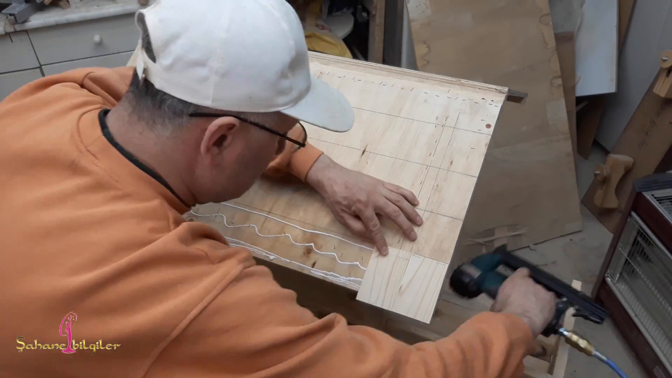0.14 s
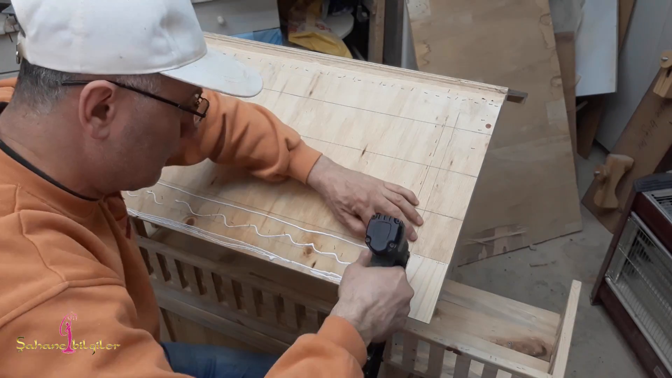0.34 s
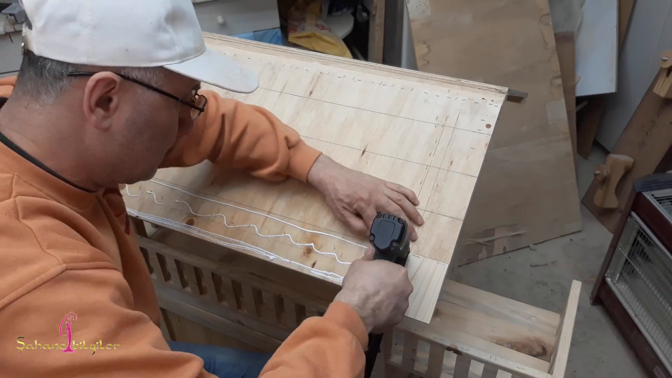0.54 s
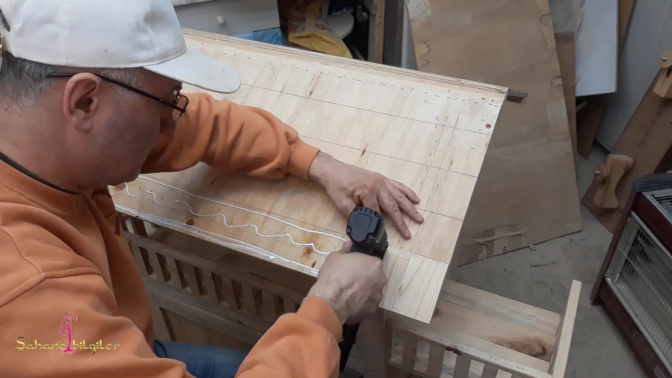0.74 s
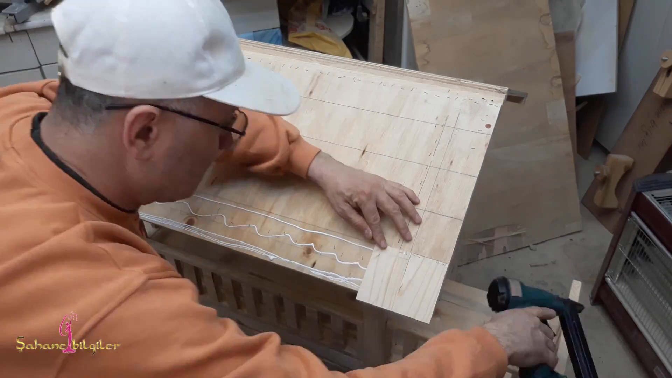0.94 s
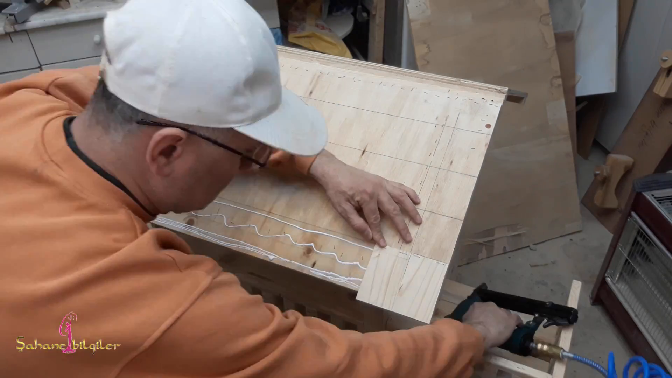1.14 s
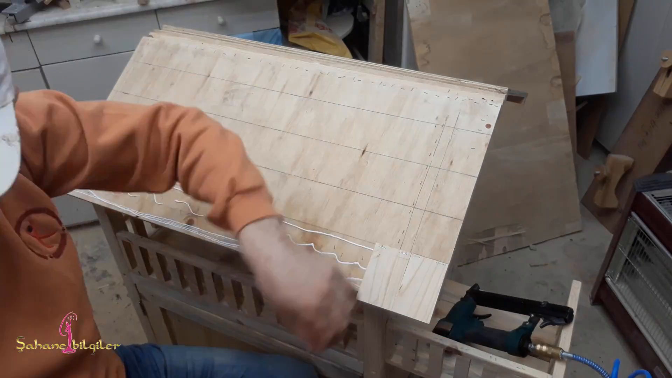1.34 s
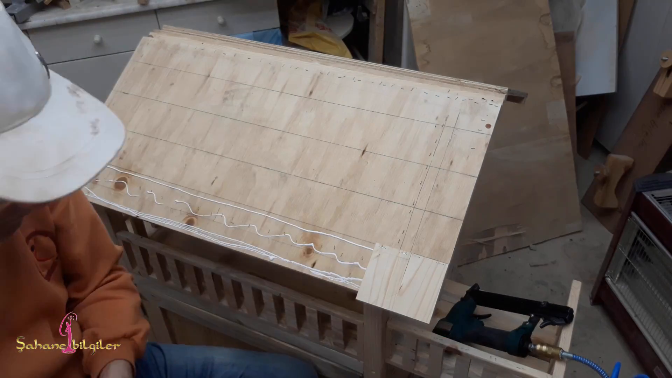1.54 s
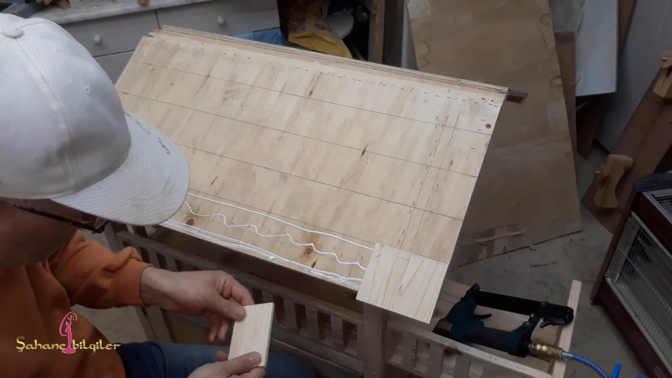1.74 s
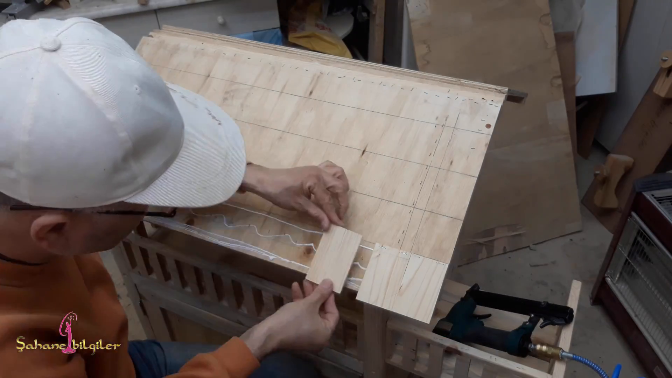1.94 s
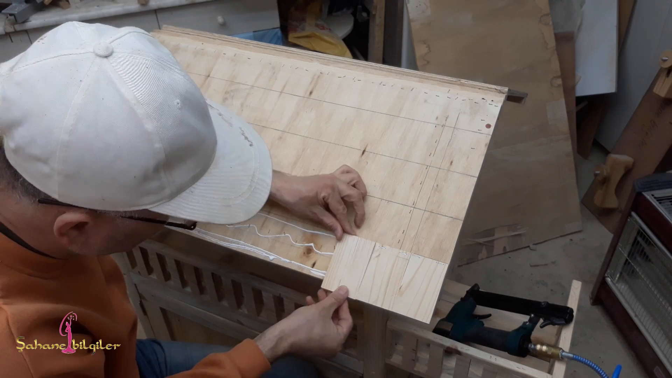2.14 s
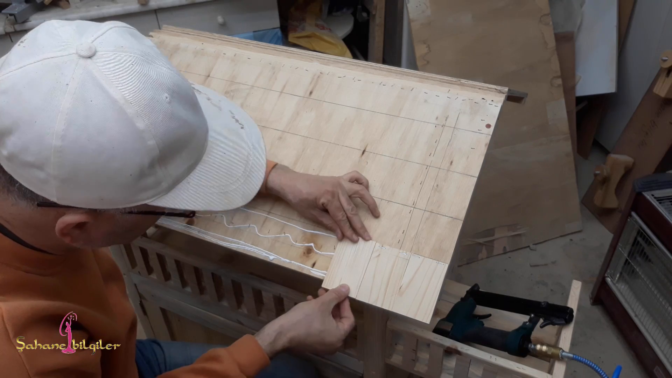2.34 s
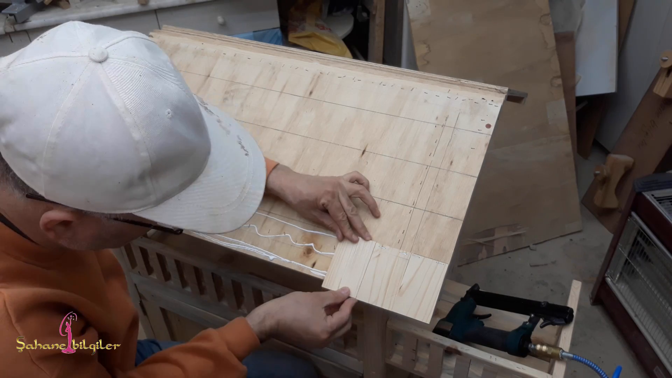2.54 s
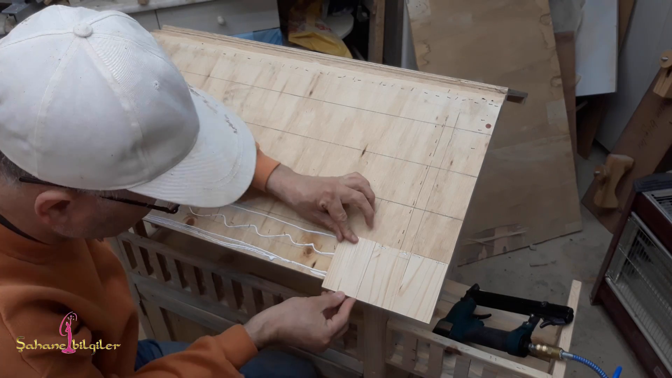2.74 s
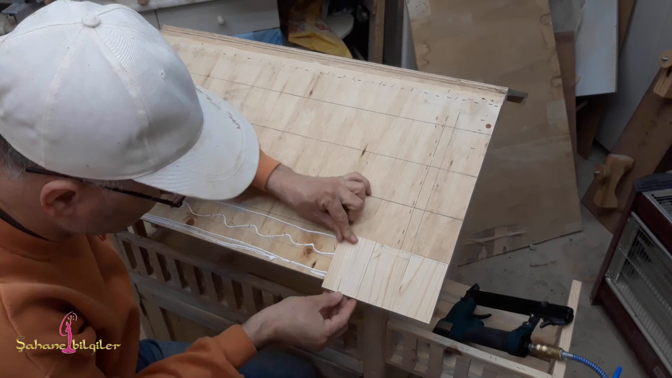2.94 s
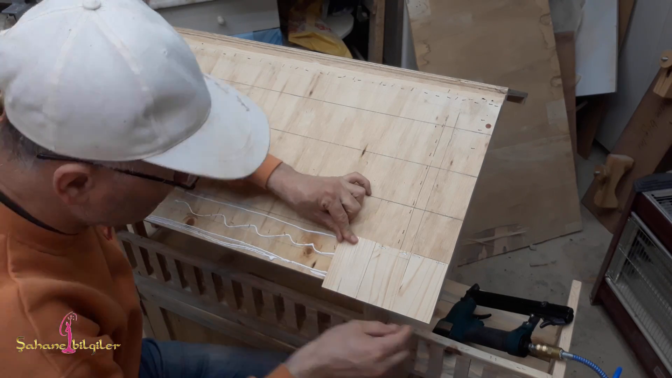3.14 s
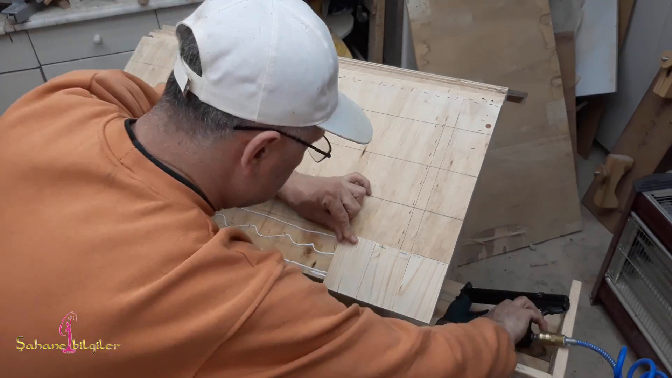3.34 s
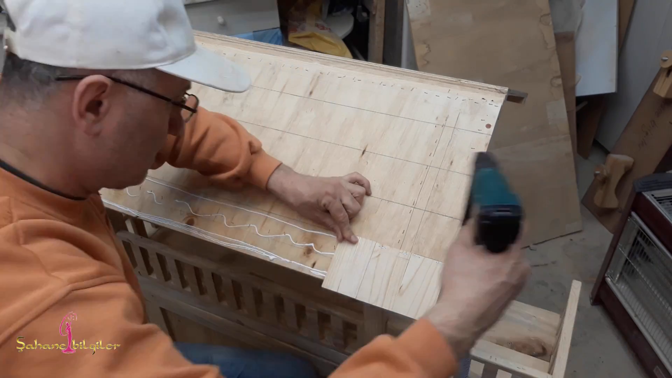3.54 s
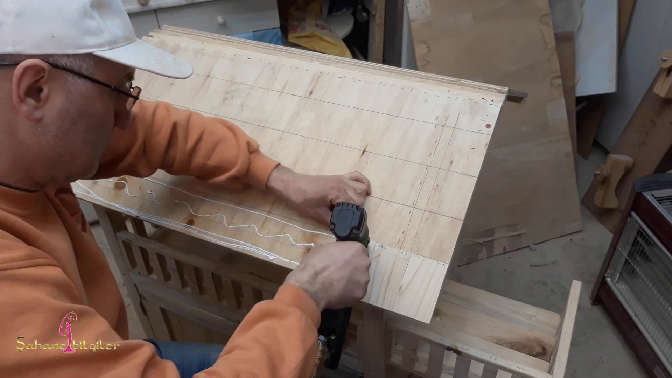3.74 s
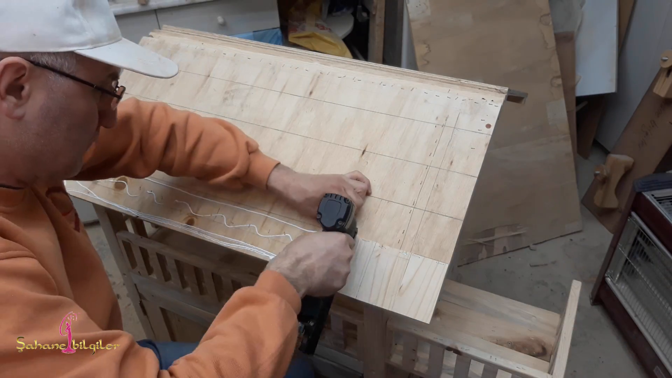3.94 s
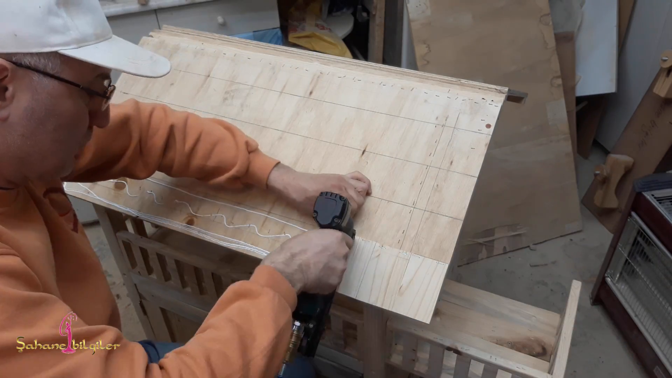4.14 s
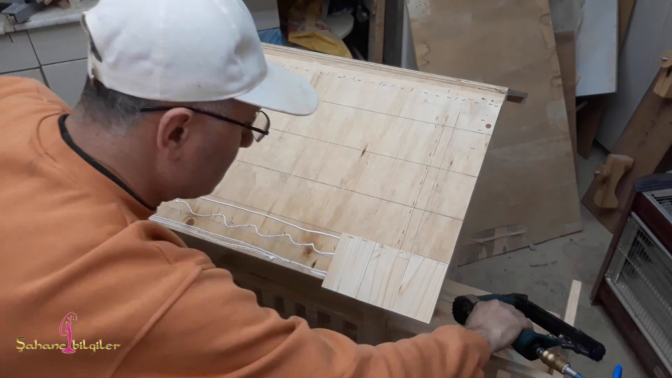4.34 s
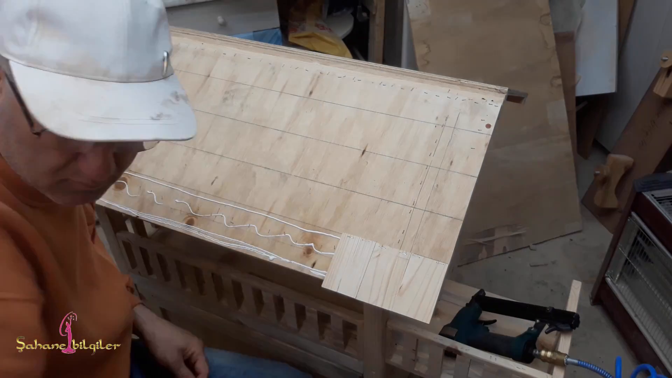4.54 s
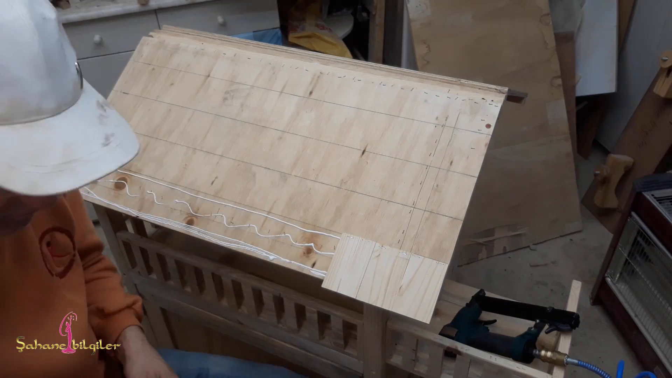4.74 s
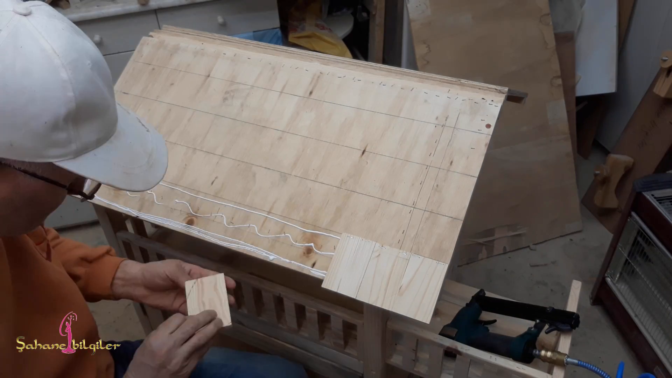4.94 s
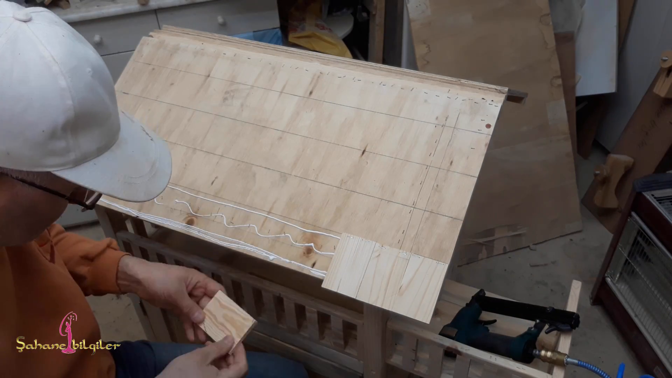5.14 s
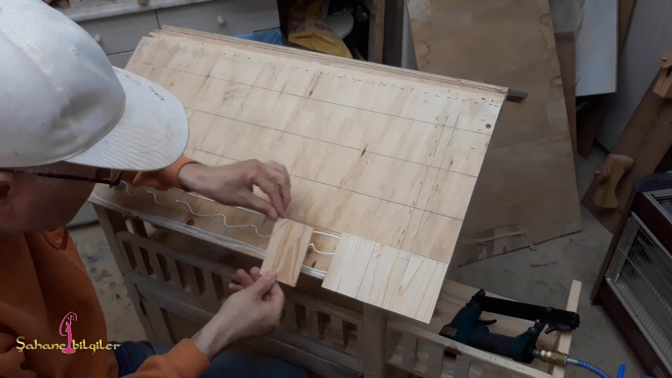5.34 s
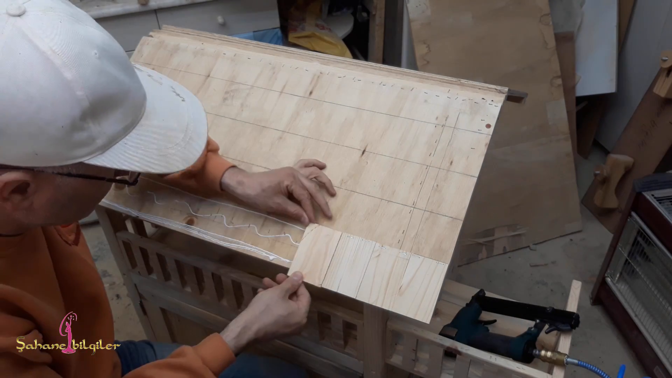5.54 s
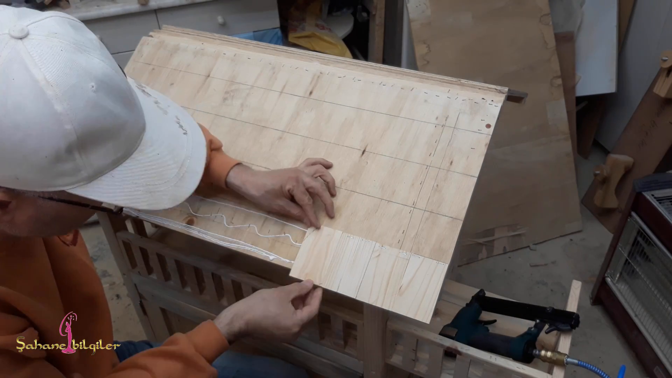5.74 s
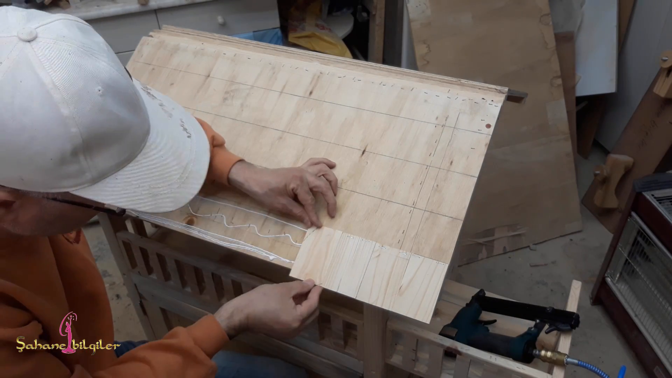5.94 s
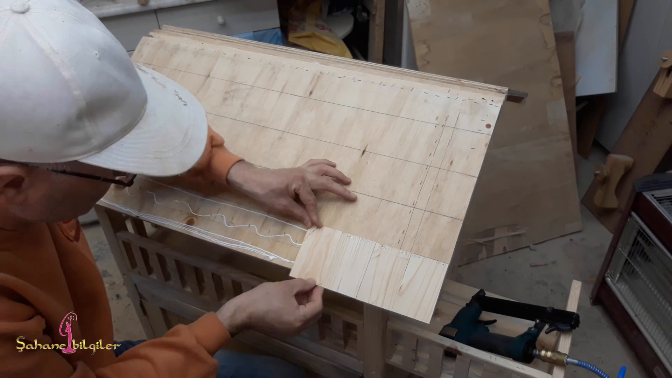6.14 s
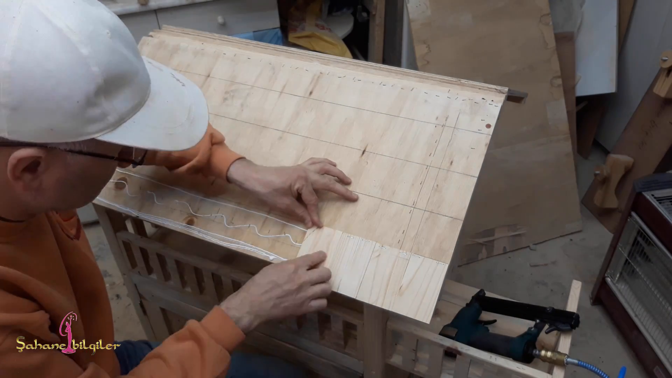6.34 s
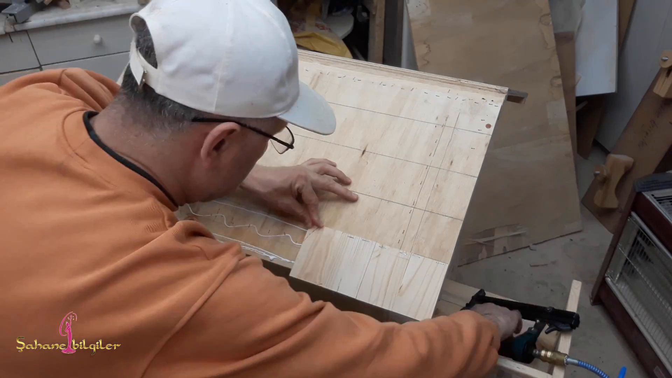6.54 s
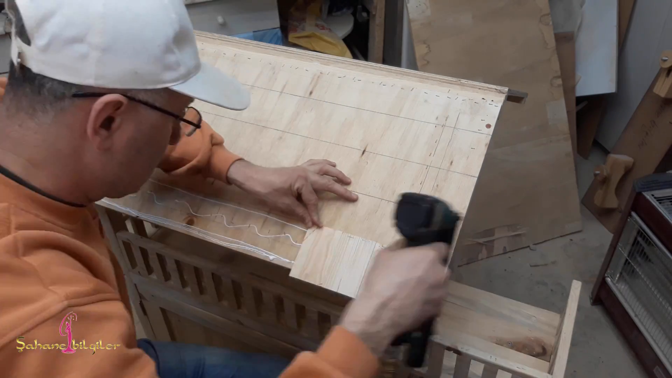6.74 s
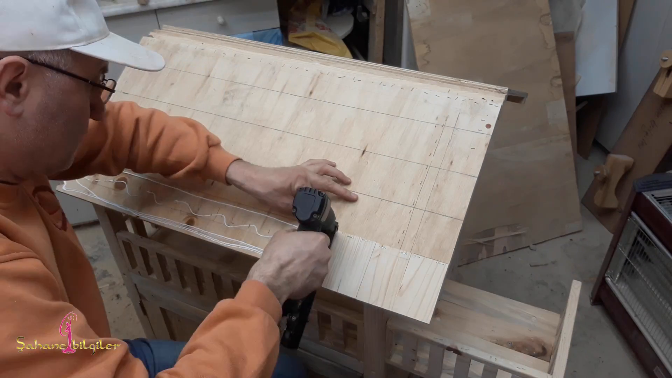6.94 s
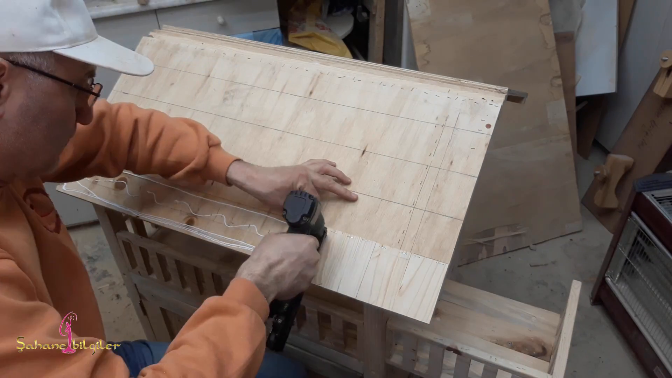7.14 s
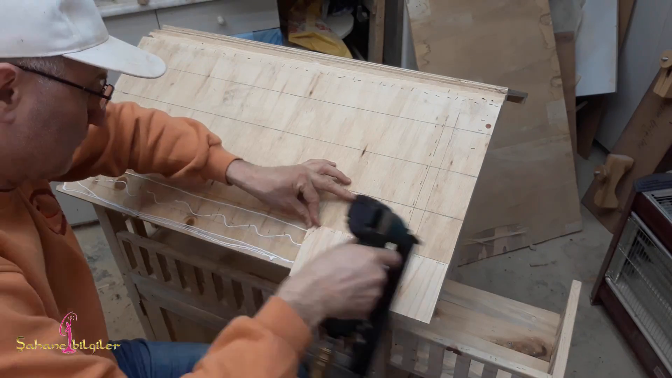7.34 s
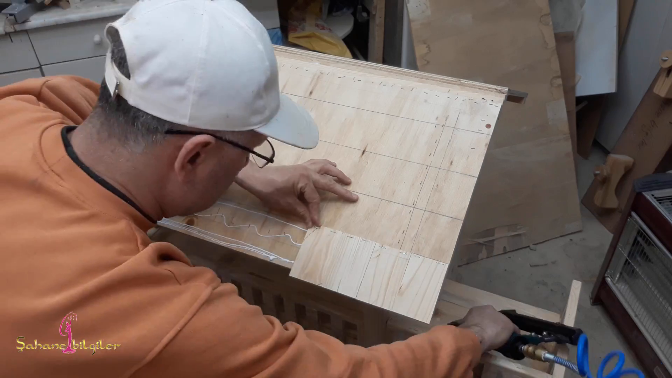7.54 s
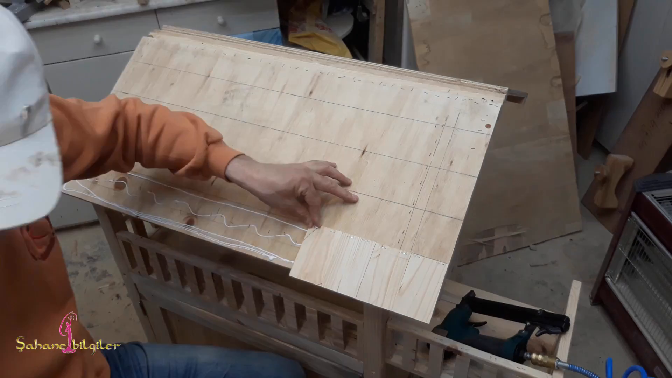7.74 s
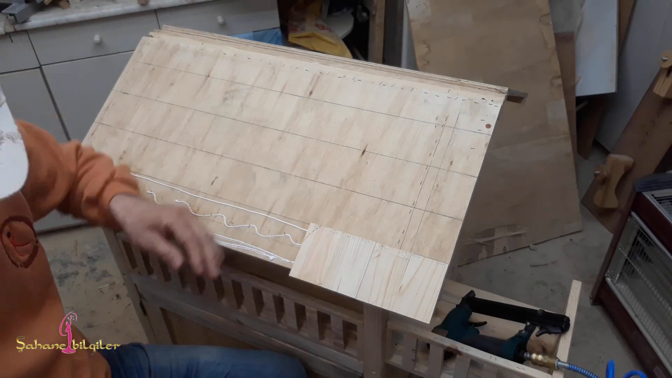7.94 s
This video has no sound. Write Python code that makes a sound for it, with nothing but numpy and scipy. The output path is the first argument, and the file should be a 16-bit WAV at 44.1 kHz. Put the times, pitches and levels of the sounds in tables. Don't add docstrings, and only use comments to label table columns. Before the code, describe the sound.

Close, nearly mono workshop sound: a continuous mechanical whine of many fixed tones, slightly fluttering, with hiss. Soft touches on wood come first, then two quick nailer cracks with exhaust puffs; the tool clunks onto a wooden rack. The same cycle returns twice more, seconds apart. Automatic level control pushes the hum down with every pair, then lets it recover.

```python
import sys
import numpy as np
from scipy import signal
from scipy.fft import rfft, irfft, next_fast_len
from scipy.io import wavfile
from scipy.ndimage import uniform_filter1d

SR = 44100
rng = np.random.default_rng(int(sys.argv[2]) if len(sys.argv) > 2 else 0)


def int16_out(signal):
    q = np.round(np.clip(np.atleast_2d(signal).T, -1, 1) * 32767)
    wavfile.write(sys.argv[1], SR, q.astype(np.int16))


def volts_from_decibels(level):
    exponent = np.asarray(level, float) / 20
    return 10 ** exponent


N = 356769

SHAFT_HZ, MAINS_HZ, DRIFT = 192.08, 400.0, .00025
# multiple of the shaft speed, multiple of the slip beat, level in dB rms.
MOTOR_TONES = [(1, 0, -63), (1, 1, -81), (2, 0, -51), (2, 1, -59), (3, 0, -63), (4, -1, -70), (4, 0, -62),
               (4, 2, -70), (4.5, 0, -68), (5, -1, -61), (5, 0, -51), (5, 1, -56), (5.5, 0, -65),
               (6, -1, -59), (6, 0, -53), (7, -2, -66), (7, -1, -53), (7, 0, -48), (7, 1, -55),
               (7.5, 0, -61), (8, -1, -65), (8, 0, -46), (8, 1, -63), (9, -1, -59), (9, 0, -61),
               (10, -1, -64), (22, 0, -59), (24, 1, -57), (44, 0, -74), (46, 1, -68)]
# multiple of the shaft speed, level in dB rms of each side tone.
RATTLE = [(11, -79.5), (12, -68), (13, -96), (14, -75), (15, -72), (16, -72), (17, -69), (18, -63.5),
          (19, -63), (20, -62), (21, -64.5), (23, -71), (25, -70), (26, -91)]
# centre in Hz, width in Hz,
# lift in dB.
CASING = [(353, 80, 4.5), (764, 46, 11), (903, 29, -5), (1140, 89, 6), (1644, 55, -6.5), (1749, 260, 7.5),
          (2485, 170, 5.5), (2720, 22, -8), (3322, 47, -11), (3300, 112, 12.5), (3433, 89, 2.5),
          (3882, 127, 8), (4150, 38, -4), (4414, 32, 9), (4740, 34, -14), (5140, 66, 5), (5370, 67, -12.5),
          (5470, 110, 6), (6095, 550, 8), (6787, 130, 5.5), (7500, 130, 3.5), (7720, 118, -8),
          (7940, 250, 8), (9300, 160, 0.5), (12800, 150, 6.5), (14840, 700, 6)]
# frequency in Hz, level in dB per Hz.
RUSH = [(20, -32.5), (150, -31.5), (260, -23.5), (340, -14.5), (480, -16), (700, -16), (1000, -7.5),
        (1500, -8.5), (2200, -9), (4000, -8), (5000, -10.5), (6600, -16.5), (10000, -17), (15800, -19.5)]
RUSH_DB = -38.5
# first shot in seconds, end of hold in seconds,
# recovery in seconds.
DUCKS = [
    (0.576, 1.124, 0.056),
    (3.906, 4.41, 0.15),
    (7.147, 7.608, 0.063),
]
OPEN_DB, DUCK_DB, FALL_S, SOFT_START = 0, -18, 0.06, 1.1

# frequency in Hz, level in dB per Hz.
AIR = [(25, -24), (200, -28), (600, -5), (1400, -6), (2200, -4.5), (3500, -2), (5700, 2), (7500, 0),
       (9500, 2.5), (12000, -0.5), (15400, 2), (16500, -2)]
# frequency in Hz, width in Hz, level in dB.
WOOD = [(398, 33, -0.5), (480, 77, -20), (554, 54, 4.5), (855, 15, 2), (975, 16, -24), (1085, 200, 9),
        (1410, 22, 0), (1530, 130, 9.5), (1887, 170, 13.5), (2010, 39, 6.5), (2430, 180, 4),
        (2770, 300, 16.5), (3500, 340, 15), (4000, 1700, 24)]
# start in seconds, frequency in Hz, peak in dB,
# time to fall 60 dB in seconds.
RINGS = [(.146, 503, -43.5, 0.12), (.565, 1480, -16.5, 0.044), (.592, 700, -21.5, 0.02),
         (0.599, 1013, -18.5, 0.041), (0.602, 1410, -20.5, 0.035), (.603, 369, -28.5, .06),
         (3.894, 624, -22.5, 0.0091), (3.914, 2060, -28, .05), (3.945, 1534, -34, 0.076),
         (4.172, 2020, -27, 0.047), (4.198, 610, -27.5, 0.023), (7.01, 1077, -22, 0.033),
         (7.124, 2840, -19, 0.043), (7.123, 1435, -20, 0.071), (7.137, 1085, -19, .054),
         (7.143, 2010, -21, 0.034), (7.157, 443, -28.5, .037), (7.171, 837, -26.5, 0.1),
         (7.304, 1120, -26, 0.078), (7.339, 650, -17.5, 0.016), (7.66, 1530, -25, 0.048)]
RING_RISE_S = 0.0033
# start in seconds, air in dB rms, wood in dB rms,
# held time in seconds, centre of the wood sound in Hz.
TOUCHES = [(.14, -55, -51, 0.017, 480), (0.473, -45, -38, 0.011, 1530), (1.087, -64.5, -55, .0094, 800),
           (1.142, -62, -40.5, .018, 900), (1.164, -36, -28.5, 0.0068, 1330), (1.197, -45, -31, 0.022, 970),
           (3.284, -53, -39.5, 0.013, 800), (3.798, -55, -47, .01, 500), (4.413, -54, -46.5, 0.0084, 900),
           (4.482, -53, -36, 0.035, 1150), (4.612, -42, -58, .004, 2500), (6.52, -58, -52.5, .011, 800),
           (7.57, -55, -45.5, 0.016, 1000), (7.605, -71, -44, 0.014, 1550),
           (7.63, -65.5, -40.5, 0.036, 1070), (7.688, -48, -33.5, .01, 1090)]
TOUCH_T60_S = 0.1
# start in seconds, air in dB rms, wood in dB rms, held time in seconds.
KNOCKS = [
    (.215, -37.5, -46, .003),
    (1.209, -39, -36, .0065),
    (1.7, -39.5, -58, .003),
    (4.0058, -53, -43, 0.0033),
    (4.4749, -40.5, -30, 0.0042),
    (4.652, -34.5, -33, 0.0056),
    (7.008, -34.5, -26.5, .004),
    (7.66, -48, -35, 0.016),
]
KNOCK_T60_S, KNOCK_HZ = 0.057, 2500
# frequency in Hz, level in dB, time to fall 60 dB in seconds.
RACK = [(413, -7.5, 0.14), (979, -2, 0.12), (1774, -3, 0.025)]
# start in seconds, peak in dB, hardness in dB per octave.
LANDINGS = [
    (1.168, -27, 5.5),
    (1.207, -30.5, -3.5),
    (3.298, -40, 0),
    (4.421, -47, -8),
    (4.483, -31, 7),
    (4.506, -32.5, -3.5),
    (7.019, -36, -8),
    (7.574, -39.5, 0),
    (7.676, -27, -1.5),
]
LANDING_RISE_S = .008

# start in seconds, air in dB rms, wood in dB rms, held time in seconds,
# clatter peak in dB.
RETURNS = [
    (.5866, -25.5, -26.5, 0.018, -5),
    (.854, -25, -29.5, 0.0084, -7.5),
    (3.9343, -23.5, -29.5, 0.013, -7.5),
    (4.1972, -21.5, -33.5, 0.0069, -4.5),
    (7.1546, -26, -23.5, 0.017, -4),
    (7.3361, -22.5, -38, 0.0064, 1),
]
RETURN_T60_S, RETURN_HZ = 0.041, 960
CLATTER_LAG_S, CLATTER_GAP_S, CLATTER_LOSS_DB, CLATTER_MS = 0.003, .0027, -4, 0.1
# start in seconds, air in dB rms, wood in dB rms, held time in seconds,
# air of the exhaust puff in dB rms.
SHOTS = [
    (.551, -14.5, -31.5, 0.0085, -17.5),
    (0.82, -9.5, -29.5, 0.0021, -33),
    (3.8958, -6, -32, 0.0019, -16),
    (4.1585, -9.5, -26, 0.0055, -44),
    (7.1219, -9.5, -27, 0.00386, -15.5),
    (7.302, -8.5, -23, .0051, -31),
]
SHOT_T60_S, SHOT_HZ, DRIVER_DB, DRIVER_MS = 0.057, 1160, -11, 0.21
VALVE_LEAD_S, VALVE_AIR_DB, VALVE_WOOD_DB = 0.0049, -26, -40
PUFF_LAG_S, PUFF_WOOD_DB, PUFF_HELD_S, PUFF_T60_S, PUFF_HZ = 0.01, -10.5, 0.0086, 0.076, 1540


def evened(x):
    return x / np.sqrt(np.mean(x ** 2) + 1e-20)


def read(points, hz):
    f, value = np.transpose(points)
    return np.interp(np.log(hz + 1), np.log(f + 1), value)


def coloured(size, shape_db):
    fast = next_fast_len(size)
    hz = np.fft.rfftfreq(fast, 1 / SR)
    spectrum = rfft(rng.standard_normal(fast)) * volts_from_decibels(shape_db(hz))
    return evened(irfft(spectrum, fast)[:size])


def add(mix, s, sound):
    part = mix[round(s * SR):][:len(sound)]
    part += sound[:len(part)]


def shaft_tones(shaft, beat):
    tones = np.zeros(N)
    for k, b, db in MOTOR_TONES:
        lag = np.pi / 2 * abs(b) + .6 * rng.standard_normal()
        tones += volts_from_decibels(db) * np.cos(k * shaft + b * beat + lag)
    return tones


def rattle(shaft, beat, spread=1.9, scatter_db=5.0):
    sides = np.arange(-4, 4)
    spins = np.exp(1j * sides[:, None] * beat)
    knocking = np.zeros(N)
    for k, db in RATTLE:
        scatter = scatter_db * rng.standard_normal(len(sides))
        size = volts_from_decibels(db - ((sides + .5) / spread) ** 4 + scatter)
        lag = .4 * rng.standard_normal(len(sides)) + .35 * (k - 19) * sides
        swell = (size * np.exp(1j * lag)) @ spins
        carrier = np.exp(1j * (np.round(k) * shaft + 2 * np.pi * rng.random()))
        knocking += (swell * carrier).real
    return knocking


def motor_rush(beat, ripple_db=1.5):
    ripple = ripple_db * rng.standard_normal(300)

    def shape_db(hz):
        casing = sum(db / (1 + (2 * (hz - f) / width) ** 2) for f, width, db in CASING)
        walls = np.interp(hz, np.linspace(0, SR / 2, len(ripple)), ripple)
        return read(RUSH, hz) + casing + walls

    rush = coloured(N, shape_db)
    chatter = signal.sosfilt(signal.butter(2, [3100, 4200], "band", fs=SR, output="sos"), rush)
    return rush + 0.22 * np.cos(beat) * chatter


def motor():
    t = np.arange(N) / SR
    wander = sum(np.sin(2 * np.pi * (f * t + rng.random())) for f in np.linspace(.1, .8, num=4)) / 2
    shaft = 2 * np.pi * np.cumsum(SHAFT_HZ * (1 + DRIFT * wander)) / SR
    beat = 2 * np.pi * MAINS_HZ * t - 2 * shaft
    tones = shaft_tones(shaft, beat) + rattle(shaft, beat)
    return np.sqrt(2) * tones + volts_from_decibels(RUSH_DB) * motor_rush(beat)


def ducking():
    t, gain_db = np.arange(N) / SR, OPEN_DB
    for start, release, back in DUCKS:
        down = 1 - np.exp(-np.maximum(t - start, 0) / FALL_S)
        still_down = np.exp(-(np.maximum(t - release, 0) / back) ** SOFT_START)
        gain_db = gain_db + DUCK_DB * down * still_down
    return volts_from_decibels(gain_db)


def ring(s, hz, db, rise, t60):
    t = np.arange(int(.2 * SR)) / SR
    swell = np.sin(np.pi / 2 * np.clip(t / rise, 0, 1))
    decay = volts_from_decibels(-60 * np.maximum(t - rise, 0) / t60)
    return s, volts_from_decibels(db) * swell * decay * np.sin(2 * np.pi * (hz * t + rng.random()))


def board_ring(s, hz, db, t60):
    return [ring(s, hz, db, RING_RISE_S, t60)]


def landing(s, db, hardness_db):
    middle_hz = RACK[1][0]
    return [ring(s, hz, db + own_db + hardness_db * np.log2(hz / middle_hz), LANDING_RISE_S, t60)
            for hz, own_db, t60 in RACK]


def struck_wood(blow, hz, reach):
    wood = 0
    for f, width, db in WOOD:
        r, turn = np.exp(-np.pi * width / SR), 2 * np.pi * f / SR
        share = volts_from_decibels(db - 10 * (np.log2(f / hz) / reach) ** 2)
        mode = [np.sqrt(1 - r * r) * np.sin(turn)], [1, -2 * r * np.cos(turn), r * r]
        wood = wood + share * signal.lfilter(*mode, blow)
    return signal.sosfilt(signal.butter(6, 290., "high", fs=SR, output="sos"), wood)


def burst(s, air_db, wood_db, held, t60, hz, rise=0.0014, lumps_db=2.0, reach=1.0, strike=7.1, damp=0.08):
    t = np.arange(int(.15 * SR)) / SR
    fade_db = -60 * np.maximum(t - held, 0) / max(t60, .01)
    shape = np.clip(t / rise, 0, 1) * volts_from_decibels(fade_db)
    puffs, bounces = (evened(uniform_filter1d(rng.standard_normal(len(t)), size=50)) for _ in range(2))
    air = coloured(len(t), lambda f: read(AIR, f)) * shape * volts_from_decibels(lumps_db * puffs)
    blow = rng.choice([-1., 1.], len(t)) * shape * volts_from_decibels(2 * lumps_db * bounces)
    blow[20] += strike
    wood = struck_wood(blow, hz, reach)
    wood *= volts_from_decibels(damp * fade_db)
    held_part = wood[:int((held + .004) * SR)]
    return s, volts_from_decibels(air_db) * air + volts_from_decibels(wood_db) * wood / np.sqrt(np.mean(held_part ** 2))


def touch(s, air_db, wood_db, held, hz):
    return [burst(s, air_db, wood_db, held, TOUCH_T60_S, hz, rise=0.0034, strike=0)]


def knock(s, air_db, wood_db, held):
    return [burst(s, air_db, wood_db, held, KNOCK_T60_S, KNOCK_HZ)]


def tap(s, db, ms, way):
    u = np.arange(600) / SR / (ms / 1000)
    push = np.exp(-u ** 2) * (u > 0)
    pull = u * np.exp(-.7 * u)
    return s, way * volts_from_decibels(db) * (push - .97 * pull * push.sum() / pull.sum()) * 1.3


def homecoming(s, air_db, wood_db, held, clatter_db, count=3):
    sounds = [burst(s, air_db, wood_db, held, RETURN_T60_S, RETURN_HZ)]
    for k in range(count):
        hit = s + CLATTER_LAG_S + CLATTER_GAP_S * k ** 1.2
        sounds.append(tap(hit, clatter_db + CLATTER_LOSS_DB * k, CLATTER_MS, (-1) ** k))
    return sounds


def valve_hiss(s):
    return burst(s - VALVE_LEAD_S, VALVE_AIR_DB, VALVE_WOOD_DB, VALVE_LEAD_S, 0.014, 940)


def driver_slide(s):
    return burst(s - .003, -32, -52, .003, .02, 900, rise=0.0028, strike=0)


def shot(s, air_db, wood_db, held, puff_db):
    return [tap(s + 0.00098, DRIVER_DB, DRIVER_MS, rng.choice([-1, 1])),
            burst(s, air_db, wood_db, held, SHOT_T60_S, SHOT_HZ),
            burst(s + PUFF_LAG_S, puff_db, puff_db + PUFF_WOOD_DB, PUFF_HELD_S, PUFF_T60_S, PUFF_HZ)]


def scene():
    mix = motor()
    for s, *_ in SHOTS:
        add(mix, *valve_hiss(s))
    mix = mix * ducking()
    for s, *_ in SHOTS:
        add(mix, *driver_slide(s))
    for source, rows in ((board_ring, RINGS), (touch, TOUCHES), (knock, KNOCKS), (landing, LANDINGS),
                         (homecoming, RETURNS), (shot, SHOTS)):
        for row in rows:
            for s, sound in source(*row):
                add(mix, s, sound)
    return np.array([mix, mix])


def band_limit(x):
    return signal.sosfilt(signal.butter(12, 16990, fs=SR, output="sos"), x)


def record(dry):
    power_db = 10 * np.log10(abs(uniform_filter1d(dry[0] ** 2, 300)) + 1e-12)
    late = np.roll(dry[0], 37)
    treble = signal.sosfilt(signal.butter(4, 4000., "high", fs=SR, output="sos"), late)
    side_treble = volts_from_decibels(-35) * treble * np.clip((power_db + 24) / 6, 0, 1)
    rounded = .75 * np.tanh(dry / .75)
    wide = rounded + np.array([side_treble, -side_treble])
    low_pass = signal.firwin(191, 15750, window=("kaiser", 5), fs=SR)
    mix = signal.oaconvolve(wide, low_pass[None], "same")
    return band_limit(mix)


dry = scene()
out = record(dry)
int16_out(out)
```